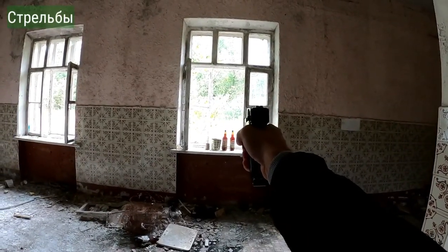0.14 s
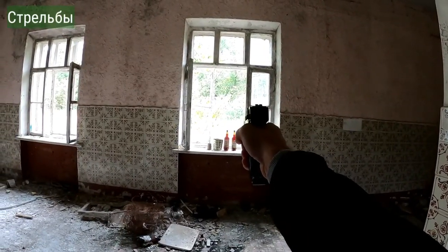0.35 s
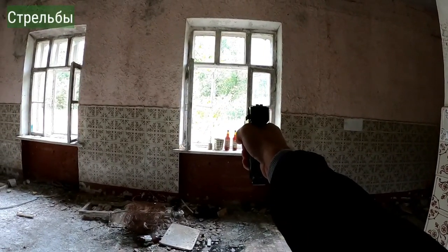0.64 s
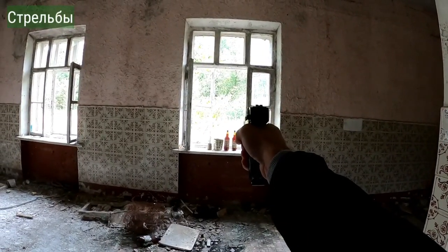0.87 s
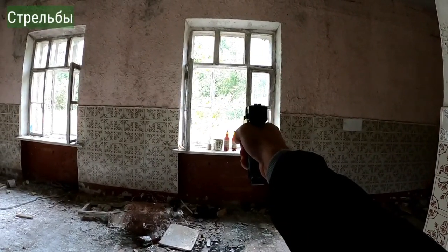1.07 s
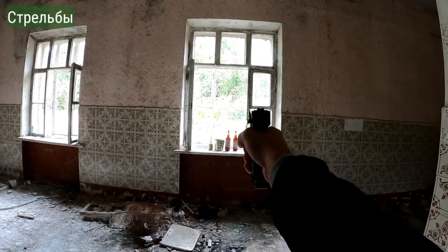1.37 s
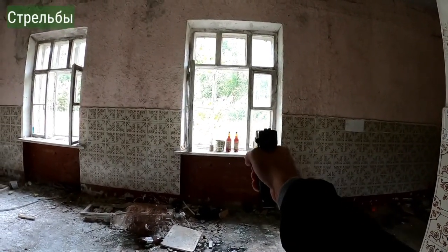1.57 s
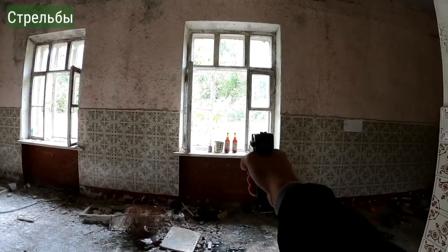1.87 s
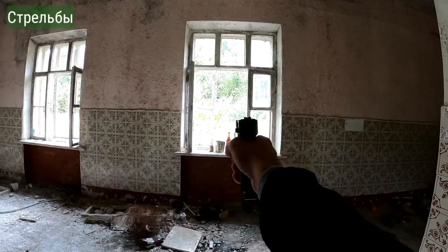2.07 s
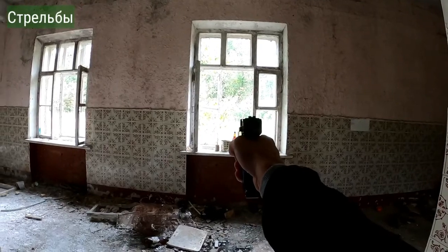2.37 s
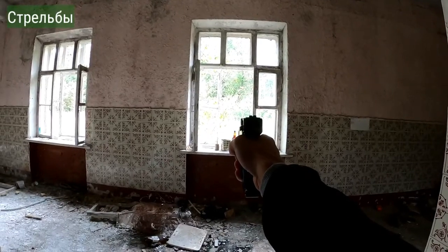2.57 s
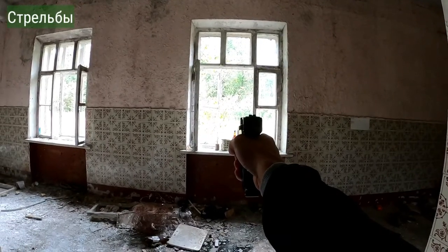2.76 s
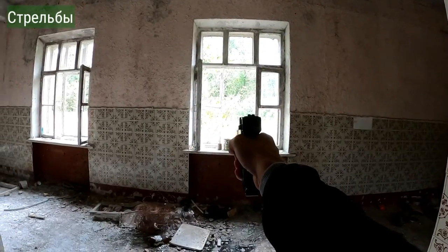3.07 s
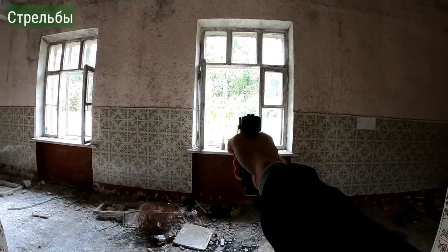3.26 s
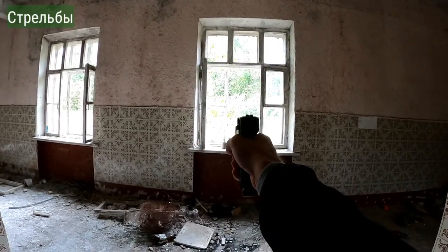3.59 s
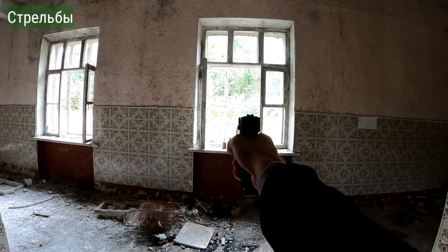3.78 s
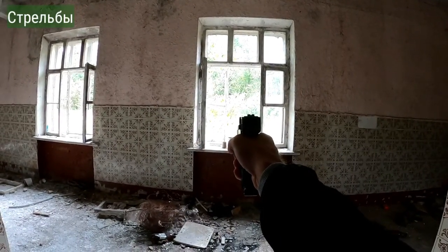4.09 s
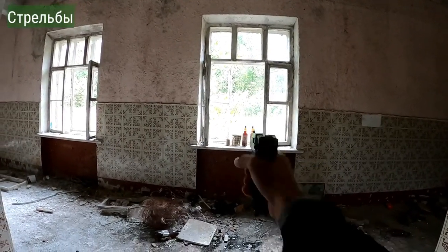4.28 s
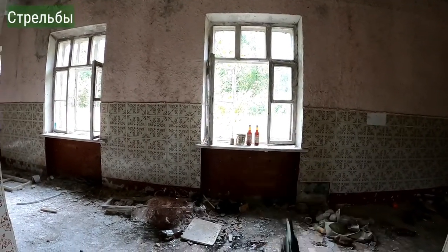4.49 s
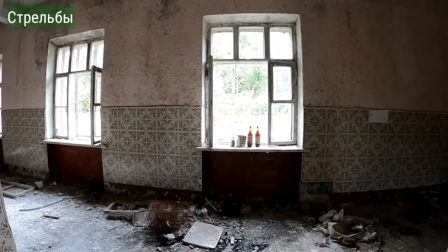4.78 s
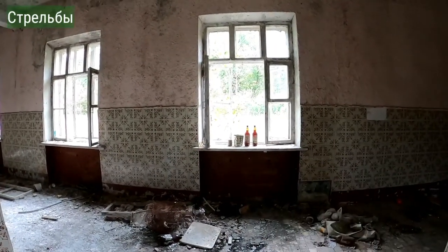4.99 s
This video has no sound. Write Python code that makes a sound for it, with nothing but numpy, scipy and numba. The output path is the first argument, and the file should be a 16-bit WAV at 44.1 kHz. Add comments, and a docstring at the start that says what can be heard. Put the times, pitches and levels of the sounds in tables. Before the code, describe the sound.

A gas pistol cracks three times in an empty room over earlier reverberation; a pellet rings a tin, another clinks glass.

```python
"""A gas pistol is fired close by in a bare, empty room; an earlier shot is still dying away at the start.
The trigger clicks, the hammer falls and gas pops out: noise rattles set damped tones ringing, with a low swing.
Delayed copies are the nearest echoes, and decaying noise bands make the long tail of the room.
One pellet rings a tin, another clinks on glass and grit falls; rustle, rumble and a faint murmur lie below.
The gain control ducks at each shot and recovers, so the tail swells."""
import sys
import numpy as np
from scipy import signal
from scipy.fft import rfft, irfft, next_fast_len
from scipy.io import wavfile
from numba import njit

SR = 44100
rng = np.random.default_rng(int(sys.argv[2]) if len(sys.argv) > 2 else 0)


def generate_wav(sig):
    """Save sig (samples, or channels by samples) to the path in sys.argv[1] as 16-bit PCM at SR."""
    pcm = np.round(np.clip(np.atleast_2d(sig).T, -1, 1) * 32767).astype(np.int16)
    wavfile.write(sys.argv[1], SR, pcm)


N = 226611  # length of the result [samples]
LEAD = SR // 2  # spare samples before time zero, for the earlier shot
M = next_fast_len(N + LEAD + SR)  # working length [samples]
HZ = np.arange(M // 2 + 1) * SR / M + 1e-3  # every frequency of a spectrum, kept above zero for the log

# every shot: (time [s], strength [dB], left minus right [dB], rumble [dB])
SHOT_TABLE = [(-0.37, -4.5, 3.5, -44.5), (1.1060, -4, 1, -41), (2.8485, -6, -5, -52),
              (3.9996, -6.5, -2.5, -46.5)]


def undb(db):
    """Turn decibels into a plain factor."""
    return 10 ** (np.asarray(db) / 20)


def over_hz(table):
    """Columns of a table read at every frequency, in straight lines on a log frequency axis."""
    hz, *columns = np.transpose(table)
    return [np.interp(np.log(HZ), np.log(hz), column) for column in columns]


def ring(hz, t60_s):
    """One tone after a single blow: a sine that falls by 60 dB in t60_s."""
    t = np.arange(int(t60_s * SR) + 8) / SR
    return np.sin(2 * np.pi * hz * t) * np.exp(-np.log(1000) * t / t60_s)


def add(track, s, sound):
    """Mix a sound into a track at s seconds."""
    start = int(round(s * SR)) + LEAD
    track[..., start:start + sound.shape[-1]] += sound[..., :M - start]


def clack(hz, t60_ms, rattle_ms, db, alike=0.4):
    """A short rattle of contacts rings a damped tone; each channel hears it a little differently."""
    t_ms = np.arange(SR // 25) / SR * 1000
    common = rng.standard_normal(len(t_ms))
    own = rng.standard_normal((2, len(t_ms)))
    # the higher the tone, the less the channels share
    share = np.clip(alike, 0, 1) / (1 + (hz / 6000) ** 2)
    rattle = np.sqrt(share) * common + np.sqrt(1 - share) * own
    rattle = rattle * np.exp(-(t_ms / max(rattle_ms, .05)) ** 4)
    # each push rebounds half a period later, so little bass is radiated
    rattle = rattle - np.roll(rattle, int(SR / hz / 2), axis=1)
    out = signal.fftconvolve(rattle, ring(hz, t60_ms / 1000)[None], axes=1)
    return out * undb(db) / np.abs(out).max()


def pistol():
    """Direct sound and first echoes: the action rattles, gas pops and cracks out, the air swings back."""
    # moving parts, and last the gas pop, none of which the echoes repeat:
    # (time after the hammer [ms], ring [Hz], t60 [ms], rattle [ms], level [dB])
    action_and_pop = [(-15, 1400, 2, 1.5, -25), (-5.5, 2500, 0.71, 8.1, -16.5), (0, 4340, 3.9, 2.1, 2.5),
                      (4.5, 9500, 2.6, 4.7, -4), (4, 2100, 4.4, 4.4, -9.5), (6, 2200, 1.9, 0.066, 6.5)]
    # gas leaving the muzzle: (time after the hammer [ms], ring [Hz], t60 [ms], rattle [ms], level [dB])
    muzzle = [(6.3, 4600, 2.6, 0.17, 12.5), (6.3, 3300, 2.1, 0.54, 13), (6.5, 1700, 3.8, 1, 13)]
    # the air swings back after the gas: (time after the hammer [ms], frequency [Hz], t60 [ms], level [dB])
    thump = (8, 164, 25, 8.8)
    # nearest surfaces: (delay [ms], crack level [dB], swing level [dB])
    echoes = [(7.6, -9, -5), (14.4, -12, -18), (20.5, -19, -20), (24.3, -17, -20)]
    swing_ms, swing_hz, swing_t60_ms, swing_db = thump
    swing = -undb(swing_db) * ring(swing_hz, swing_t60_ms / 1000)
    near = np.zeros((2, M))
    for s, db, pan_db, _ in SHOT_TABLE:
        gain = undb(db + np.array([[pan_db], [-pan_db]]) / 2)
        for ms, *part in action_and_pop:
            add(near, s + ms / 1000, gain * clack(*part))
        blast = [(ms, clack(*part)) for ms, *part in muzzle]
        # the first entry is the direct sound
        for late_ms, crack_db, bass_db in [(0, 0, 0), *echoes]:
            for ms, crack in blast:
                add(near, s + (ms + late_ms) / 1000, gain * undb(crack_db) * crack)
            add(near, s + (swing_ms + late_ms) / 1000, gain * undb(bass_db) * swing)
    return near


def puffs_to_walls():
    """The blast as the walls receive it: one impulse per shot, coloured by a spectrum."""
    # colour of the puff: (frequency [Hz], relative level [dB])
    puff_colour = [(25, -20), (60, -1.5), (130, -4), (260, 2), (400, -2.5), (590, -3.5), (800, 1.5),
                   (1100, 2), (1800, 4), (3500, -1.5), (5500, -5.5), (9000, -10.5), (15000, -22)]
    puffs = np.zeros(M)
    for s, db, _, _ in SHOT_TABLE:
        add(puffs, s + 0.0063, undb([db]))  # gas leaves 6.3 ms after the hammer
    overall_db = 40.5
    return irfft(rfft(puffs) * undb(over_hz(puff_colour)[0] + overall_db), M)


def trigger():
    """Small steel parts tick, snap, settle and scrape as the trigger is drawn."""
    # each pull: (time of the snap [s], snap level [dB], delay to the scrape [ms], scrape level [dB])
    pulls = [(0.9753, -24.5, 12.8, -27), (2.6965, -24.5, 8.2, -26.5), (3.8620, -26, 11.6, -32.5)]
    # tones of the steel parts: (frequency [Hz], t60 [ms], relative level [dB])
    steel = [(1000, 10, -11), (1750, 8, -7), (2800, 3, -6), (3800, 2.5, -5), (5200, 2.2, 0),
             (8400, 1.3, -1), (12000, .8, -13)]
    out = np.zeros((2, M))
    for s, snap_db, scrape_late_ms, scrape_db in pulls:
        # (time after the snap [ms], level [dB], rattle [ms])
        contacts = [(-8.5, snap_db - 17, 4.6),  # slack is taken up with a faint tick
                    (0, snap_db, 1.6),
                    (0, snap_db - 8.5, 5.9),  # parts settle under the snap
                    (scrape_late_ms, scrape_db, 6.9)]
        for ms, db, rattle_ms in contacts:
            for hz, t60_ms, ring_db in steel:
                add(out, s + ms / 1000, clack(hz, t60_ms, rattle_ms, db + ring_db))
    return out


def struck(hits, modes, scatter_db):
    """Every blow rattles the tones, each time in another balance; a tone is a close pair that beats."""
    out = np.zeros((2, M))
    for s, hit_db, rattle_ms in hits:
        chances = rng.standard_normal((len(modes), 3))
        for (hz, mode_db, t60_ms), (balance, *detunes) in zip(modes, chances):
            db = hit_db + mode_db + scatter_db * balance
            for detune in detunes:
                add(out, s, clack(hz * (1 + 0.01 * detune), t60_ms, rattle_ms, db, alike=1.0))
    return out


def tin():
    """A pellet hits a tin, whose thin metal rings in many tones."""
    # blows: (time [s], level [dB], rattle [ms])
    hits = [(2.8918, -7, 0.89), (2.903, -12, 8.4)]
    # tones of the tin: (frequency [Hz], relative level [dB], t60 [ms])
    modes = [(331.3, -17.5, 120), (438.5, -18.5, 62), (1123, -9, 45), (1311, -10.5, 20), (1620, -3.5, 25),
             (1699, -0.5, 35), (1980, -4, 20), (2247, -2.5, 27), (2383, -3.5, 21), (2980, -13, 8.5),
             (3660, 2, 1.5), (5540, -0.5, 0.58), (8800, -5, 1.2)]
    return struck(hits, modes, scatter_db=2.0)


def glass():
    """A pellet clinks on glass, which rings only briefly."""
    # blows: (time [s], level [dB], rattle [ms])
    hits = [(4.112, -17, 13), (4.124, -17.5, 16.3), (4.152, -26.5, 6.2), (4.378, -44, 5.9)]
    # tones of the glass: (frequency [Hz], relative level [dB], t60 [ms])
    modes = [(750, -14, 26), (940, -12, 13), (1980, -0.5, 11), (3930, -4.5, 8), (5270, -7.5, 2.2),
             (6250, -13, 13), (7800, -7.5, 13), (8200, -7, 2.9), (10300, -15, 2.8)]
    return struck(hits, modes, scatter_db=3.0)


def grit():
    """Small bits fall to the floor, each a short bright patter."""
    # landings: (time [s], level [dB], rattle [ms])
    hits = [(4.508, -50, 1.6), (4.6416, -33.5, 5.7), (4.652, -43, 10), (4.665, -36.5, 19)]
    # tones of the bits: (frequency [Hz], relative level [dB], t60 [ms])
    modes = [(2400, -1, 3), (3500, 0, 2.5), (5000, -3, 1.2), (7500, -7, .9), (11000, -14, .7)]
    return struck(hits, modes, scatter_db=1.0)


def room():
    """Spectrum of the room's tail: half-octave noise bands, each with a quick and a slow decay."""
    # (frequency [Hz], t60 [s], early surplus [dB], left-right likeness [0 to 1], left minus right [dB])
    walls = [(30, 3, 5.5, .5, -6.5), (71, 3, 9.5, 1, -1), (118, 3.18, 25, 1, 0.5),
             (306.6, 2.51, 12, 1, -0.5), (560, 2.42, -10, 0.93, 0.5), (1160, 2.167, -10, 0.96, 2.5),
             (2280, 1.58, -6, 0.4, 4), (4750, 1.15, -0.5, 1, 1), (7890, 0.69, -2.5, 0.096, -2),
             (15000, 0.44, 3.5, 0.15, -0.5)]
    early_t60_s, build_s = 0.65, 0.0037
    t = np.arange(M) / SR
    common = rfft(rng.standard_normal(M))
    own = rfft(rng.standard_normal((2, M)))
    t60_s, early_db, alike, pan_db = over_hz(walls)
    alike = np.clip(alike, 0, 1)
    noise = np.sqrt(alike) * common + np.sqrt(1 - alike) * own
    noise = noise * undb(np.array([pan_db, -pan_db]) / 2)
    early_fade = undb(-60 * t / early_t60_s)
    out = np.zeros((2, M))
    for octave in np.arange(4.5, 14.5, .5):  # band centres, as powers of two in Hz
        k = int(2 ** octave * M / SR)
        band = np.clip(1 - 2 * np.abs(np.log2(HZ) - octave), 0, 1)
        fade = undb(-60 * t / t60_s[k]) * (1 + (undb(early_db[k]) - 1) * early_fade)
        out += irfft(noise * band, M) * fade
    # reflections need some milliseconds to fill the room; the tail is cut after 4 s
    build_up = 1 - np.exp(-(t / build_s) ** 2)
    return rfft(out * build_up * (t < 4) / np.sqrt(SR))


def rumble():
    """Noise in one low resonance lingers after every shot, nearly the same in both channels."""
    # it swells after each shot, then drops in two steps: (time after the shot [s], level [dB])
    steps = [(.3, -33.5), (.55, -1.5), (.95, -2.5), (1.0, -15), (1.54, -16), (1.59, -31)]
    centre_hz, width_hz = 120.9, 43
    t = (np.arange(M) - LEAD) / SR
    after_s, shape_db = np.transpose(steps)
    swell = sum(undb(db + np.interp(t - s, after_s, shape_db)) for s, _, _, db in SHOT_TABLE)
    noise = rfft(rng.standard_normal(M) + 0.099 * rng.standard_normal((2, M)))
    out = irfft(noise / (1 + (2 * (HZ - centre_hz) / width_hz) ** 2), M)
    return out / out.std() * swell


def rustle():
    """Faint cloth noise with sparse ticks while the arm shifts."""
    # sleeve movements: (time of the loudest moment [s], relative level [dB], swell [dB per s])
    moves = [(2.21, -77, 53), (2.5, -87, 50), (2.685, -72, 180)]
    fade_db_per_s = 160
    t = (np.arange(M) - LEAD) / SR
    swell = sum(undb(db - np.maximum(rise * (s - t), fade_db_per_s * (t - s))) for s, db, rise in moves)
    # a new random level every 64 samples, seldom high
    chance = np.minimum(rng.exponential(size=M // 64 + 1), 4)
    ticks = undb(3.5 * np.repeat(chance, 64)[:M])
    noise = rng.standard_normal((2, M)) * ticks * swell
    cloth = signal.butter(2, [3500, 10000], "bandpass", fs=SR, output="sos")
    return signal.sosfilt(cloth, noise)


def hum():
    """Low murmur of the air outside: steady noise shaped by a spectrum."""
    # colour of the murmur: (frequency [Hz], relative level [dB])
    murmur = [(15, -47.5), (25, -24.5), (113, 0.5), (173, -10), (554, -30), (1780, -26), (3100, -59),
              (4480, -34.5), (14000, -62)]
    level_db = -66  # average (RMS) level
    common = rng.standard_normal(M)
    own = rng.standard_normal((2, M))
    out = irfft(rfft(common + 0.37 * own) * undb(over_hz(murmur)[0]), M)
    return out * undb(level_db) / out.std()


def scene():
    """Mix the direct sounds with their room tail and the background."""
    near, puffs, clicks = pistol(), puffs_to_walls(), trigger()
    on_tin, on_glass, on_floor = tin(), glass(), grit()
    # what each source sends to the room
    small = undb(3.0) * clicks + undb(14.0) * on_tin + undb(14.5) * on_glass + undb(14.0) * on_floor
    sent = puffs + small.mean(0)
    tail = irfft(rfft(sent) * room(), M)
    out = near + clicks + on_tin + on_glass + on_floor + tail + hum() + rumble() + rustle()
    # the right microphone is a little nearer, so the left one hears all this later
    left_lag = 2  # samples
    return np.array([out[0, LEAD - left_lag:LEAD - left_lag + N], out[1, LEAD:LEAD + N]])


@njit
def duck(size, top, ratio, attack, hold, release):
    """Gain control: follows peaks fast, waits, then lets the gain climb back."""
    gain, level, wait = np.empty(len(size)), 0., 0.
    for i in range(len(size)):
        if size[i] > level:
            level += (size[i] - level) * attack
            wait = hold
        elif wait > 0:
            wait -= 1
        else:
            level -= level * release
        gain[i] = min(1., (top / (level + 1e-9)) ** (1 - 1 / ratio))
    return gain


def record(dry):
    """Dull microphones, gain control, soft overload and the treble cut."""
    mic_hz, treble_cut_hz = 12700, 16100
    top, ratio = 0.32, 2.7  # ducking starts above this level; the excess in dB is divided by the ratio
    attack_s, hold_s, release_s = 0.00075, 0.076, 0.078
    dull = signal.sosfilt(signal.butter(2, mic_hz, fs=SR, output="sos"), dry)
    louder_side = np.abs(dull).max(0)
    gain = duck(louder_side, top, ratio, 1 / (attack_s * SR), hold_s * SR, 1 / (release_s * SR))
    overloaded = np.tanh(dull * gain)
    return signal.sosfilt(signal.ellip(8, .2, 70, treble_cut_hz, fs=SR, output="sos"), overloaded)


dry = scene()
out = record(dry)
generate_wav(out)
```